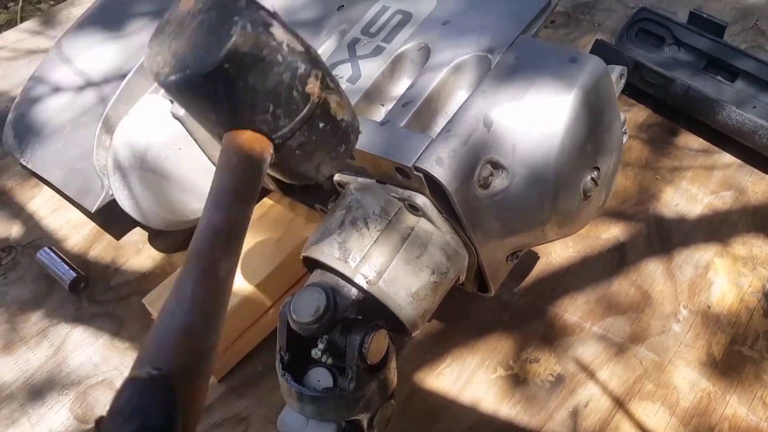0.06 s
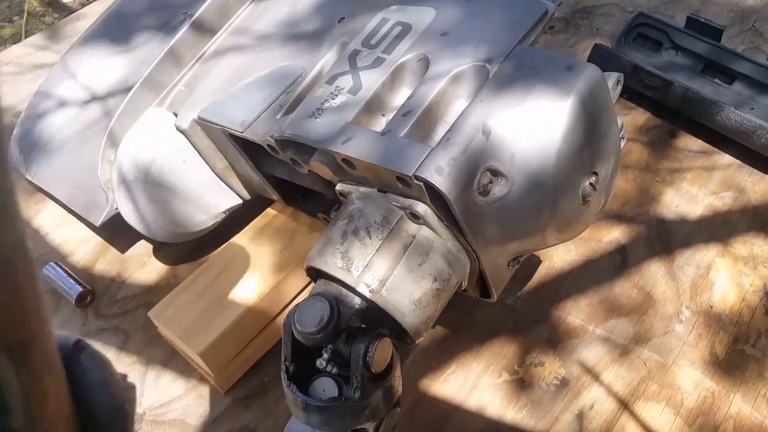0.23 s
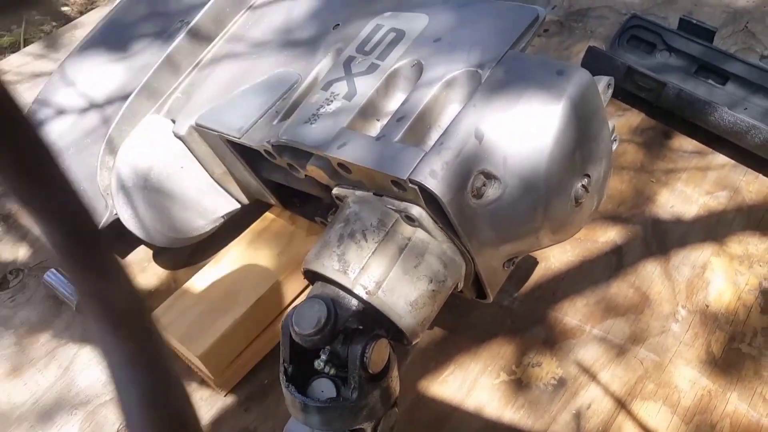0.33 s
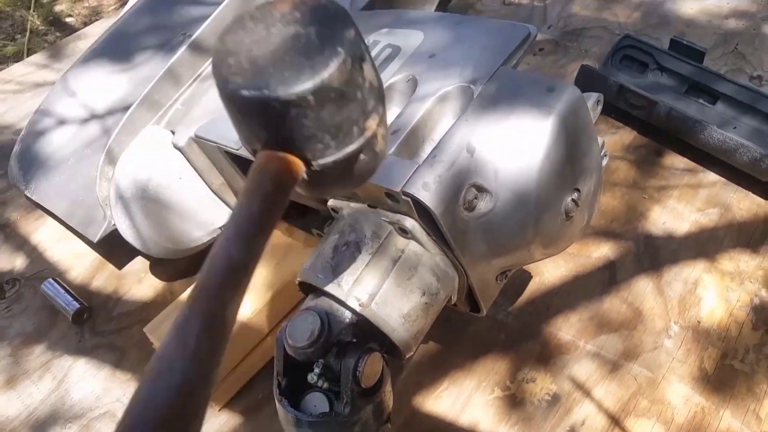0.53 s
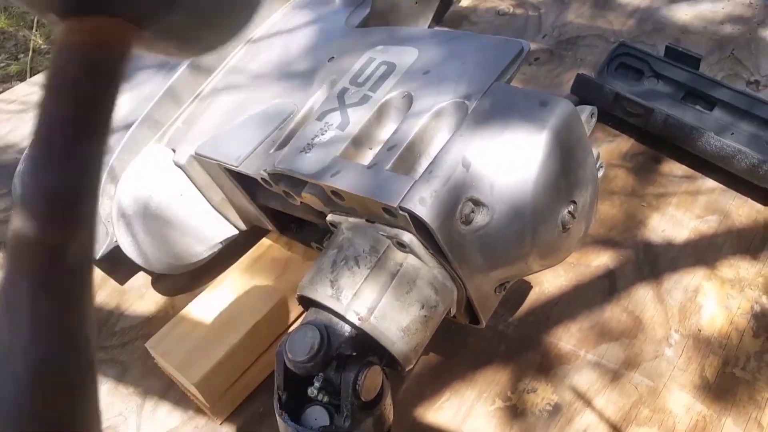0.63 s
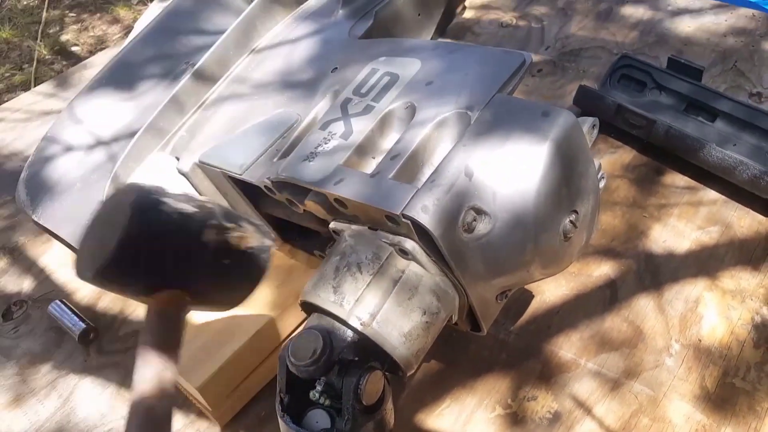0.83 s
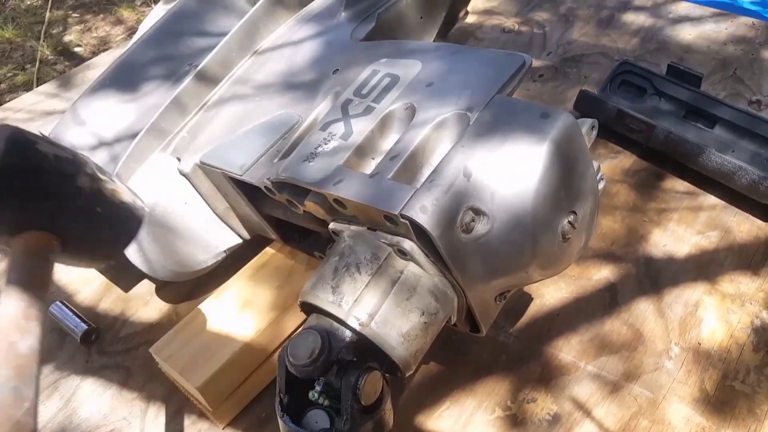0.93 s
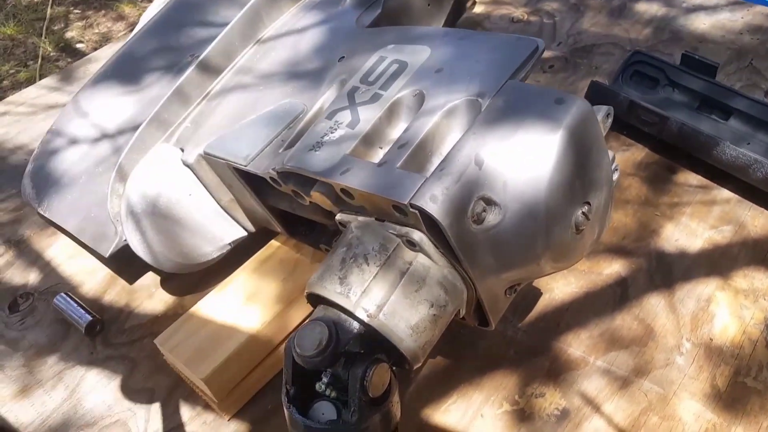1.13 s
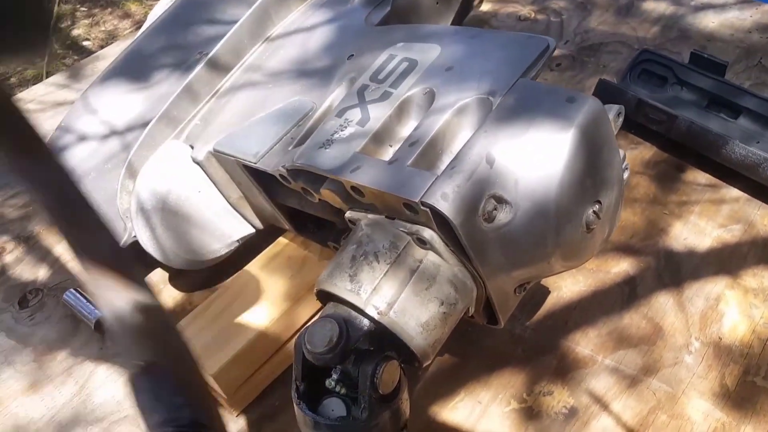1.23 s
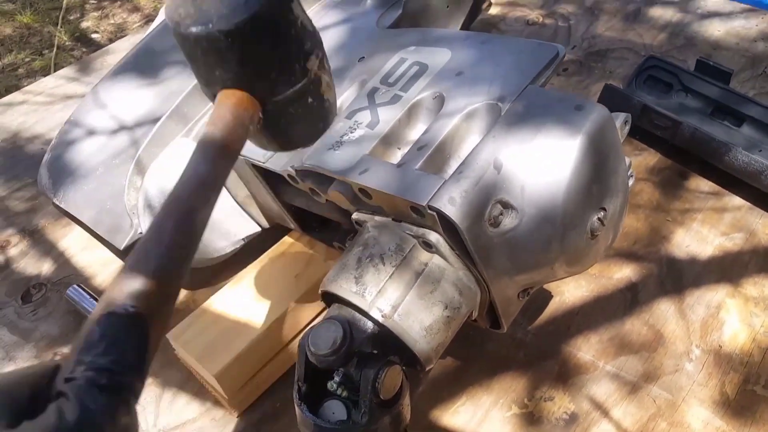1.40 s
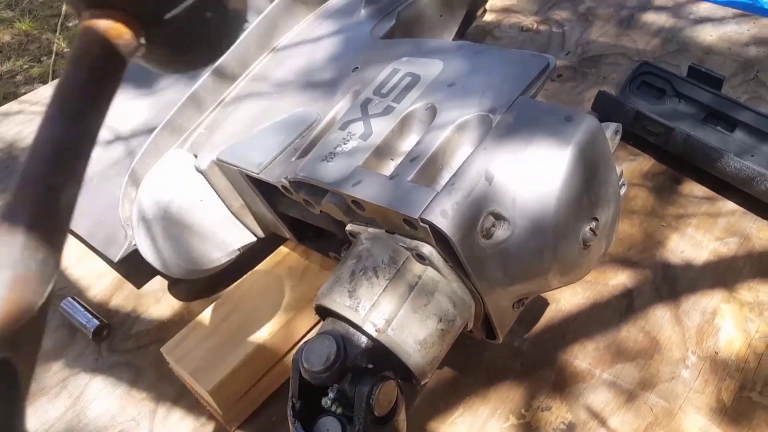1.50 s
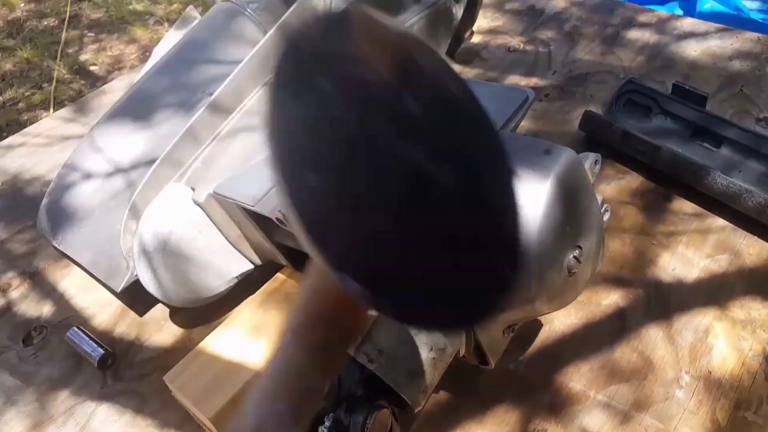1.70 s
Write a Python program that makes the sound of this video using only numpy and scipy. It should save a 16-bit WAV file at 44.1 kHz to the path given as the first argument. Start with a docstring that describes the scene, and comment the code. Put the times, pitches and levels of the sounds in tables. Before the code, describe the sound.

Four evenly spaced mallet blows thud and clank on a metal casing resting on a wooden bench, the first with a thin steely buzz; faint knocks and creaking ticks follow, heard close in quiet open air.

```python
"""Outdoors at a wooden bench: a rubber mallet hits a heavy cast metal housing four times.
Each blow is a resonant bench thump, a short shaped-noise clack, decaying sine ring and rough noise shudder;
narrow noise bands make the buzz of a loose steel part, and a soft noise tail the outdoor echo.
Between blows: noise-burst knocks, narrowband pings, faint rustles and damped-sine creaking ticks.
Steady coloured noise is the quiet open air."""
import sys
import numpy as np
from scipy.fft import rfft, irfft, next_fast_len
from scipy.io import wavfile
from scipy.ndimage import map_coordinates

SR = 44100
rng = np.random.default_rng(int(sys.argv[2]) if len(sys.argv) > 2 else 0)


def bounce(signal):
    """Save signal as a 16-bit WAV file at the path given by the first command-line argument."""
    frames = np.transpose(np.atleast_2d(signal))
    limited = np.clip(frames, -1, 1)
    pcm = np.round(limited * 32767).astype(np.int16)
    wavfile.write(sys.argv[1], SR, pcm)


N = 77175
SIZE = 32768  # samples in one event
T = np.arange(SIZE) / SR  # event time [s]

# Blow levels are relative to each source's gain; knock, ping and rustle levels are used directly.
# Blows: (time [s], thump [dB], clack [dB], clack tilt [dB/octave], shudder [dB], ring [dB],
# ring tilt [dB/octave], buzz [dB], buzz tilt [dB/octave], buzz peak after blow [s])
BLOWS = [(0.0994, 1.5, -0.5, -0.5, -0.5, -1, 3, -4.5, -6, 0.056),
         (0.5035, 0.5, -0.5, 0.5, -2, 0.5, -2, -15.5, 3.5, 0.055),
         (0.9247, 0, 3, -1.5, -4, -4.5, 2, -17, -22, .04), (1.3971, 1, -1, -.5, -2, 4, 2, -5, -10, 0.064)]
# Bench modes: (frequency [Hz], relative level [dB], T60 [s])
BENCH_MODES = [(49.4, -31, 0.26), (88, -17.5, 0.28), (136.7, -8.5, 0.094), (151.8, -17, 0.16),
               (199.9, -8, 0.095), (305, -6.5, 0.81), (374.5, -12.5, 0.39)]
# Housing modes: (frequency [Hz], relative level [dB], T60 [s])
HOUSING_MODES = [(443, -10, .3), (487, -9, .3), (564, -9, .35), (718, -15, .3), (883, -16, .3),
                 (1014, -7, .24), (1458, -3, .21), (2070, 1, .04), (2560, 4, .06), (4110, 1, .025)]
# Clack spectrum: (frequency [Hz], relative level [dB])
CLACK_SPECTRUM = [(40, -39.5), (200, 2), (500, -2.5), (900, -7.5), (1400, -4.5), (1680, -11), (2000, -2.5),
                  (2600, -2), (3000, -10), (3600, -10), (4100, -10), (4700, -20.5), (6600, -15.5),
                  (8400, -29.5), (10500, -34), (12500, -34.5), (14400, -32), (15500, -52)]
# Clack left-right likeness: (frequency [Hz], likeness [0-1])
CLACK_ALIKE = [(500, 0.82), (3000, 0.54), (10000, 0.27)]
# Shudder spectrum: (frequency [Hz], relative level [dB])
SHUDDER_SPECTRUM = [(25, -48.5), (80, -25.5), (200, 0), (330, -2.5), (600, -9.5), (1100, -11.5),
                    (1600, -19), (2600, -26), (4000, -35), (7000, -41), (9500, -40.5), (11000, -59),
                    (15000, -59)]
# General left-right likeness: (frequency [Hz], likeness [0-1])
ALIKE = [(100, .99), (300, .93), (600, .75), (1200, 0.016), (2500, 0.046), (10000, 0)]
# Loose steel resonances: (frequency [Hz], width [Hz], relative level [dB], left minus right [dB])
STEEL_MODES = [(5680, 90, -16, 0), (8538, 55, 0, -6), (9400, 700, -18, -1), (11870, 70, -10, 0),
               (12950, 450, -17, 1), (13780, 150, -22, 0)]
# Buzz left-right likeness: (frequency [Hz], likeness [0-1])
BUZZ_ALIKE = [(5000, 0.83), (12000, 0.19)]
# Settling knocks: (time [s], thud level [dB], clatter level [dB])
KNOCKS = [(0.02, -34.5, -46), (.230, -27.5, -26), (0.262, -29, -35.5), (0.331, -35.5, -38),
          (0.411, -28.5, -43.5), (0.486, -34, -50), (.608, -28.5, -29.5), (0.685, -30, -56),
          (.725, -35.5, -47.5), (1.05, -49, -41.5), (1.101, -32, -49.5), (1.194, -39, -48.5),
          (1.349, -41.5, -72), (1.531, -53, -29), (1.575, -34.5, -36), (1.611, -48, -38),
          (1.626, -42.5, -39.5), (1.741, -33.5, -64)]
# Knock thud spectrum: (frequency [Hz], relative level [dB])
THUD_SPECTRUM = [(40, -26), (120, 6.5), (190, -4), (310, -0.5), (600, -22.5), (1500, -62), (5000, -77)]
# Knock clatter spectrum: (frequency [Hz], relative level [dB])
CLATTER_SPECTRUM = [(150, -7), (500, 5.5), (1200, -4.5), (1700, -13.5), (2200, -17), (3200, -28),
                    (8000, -43), (14000, -57.5)]
# Small-part pings: (time [s], level [dB])
PINGS = [(.217, -40.5), (.606, -31)]
# Mallet-swing rustles: (time [s], length [s], level [dB])
RUSTLES = [(0.622, 0.19, -60), (1.086, 0.42, -60.5)]
# Rustle spectrum: (frequency [Hz], relative level [dB])
RUSTLE_SPECTRUM = [(300, -37), (1200, 4), (1700, -2.5), (2300, 5.5), (3500, -4.5), (4500, -7), (8000, -26),
                   (14000, -57)]
# Creaking ticks: (time [s], level before TICK_GAIN_DB [dB])
TICKS = [(.792, -46.5), (.834, -43), (.864, -46.5), (.877, -48), (.888, -43), (0.898, -44.5),
         (1.143, -45.5), (1.151, -65), (1.159, -40.5), (1.168, -42), (1.182, -48), (1.211, -40.5),
         (1.232, -45), (1.25, -41)]
# Far echo spectrum: (frequency [Hz], relative level [dB])
YARD_SPECTRUM = [(40, -35), (120, 17.5), (300, 0.5), (600, -6.5), (1500, -21.5), (3000, -30.5),
                 (6000, -52.5), (12000, -82.5)]
# Open air spectrum: (frequency [Hz], relative level [dB])
AIR_SPECTRUM = [(20, -33), (50, -1), (85, -3.5), (120, 2.5), (170, -15.5), (300, -10.5), (600, -20),
                (1500, -31), (3000, -33), (5000, -42), (9300, -37.5), (11000, -48.5), (15000, -50.5)]

AIR_DB = -48.5
THUD_T60_S, CLATTER_T60_S = 0.17, 0.064
THUMP_DB, CONTACT_S = -3.5, 0.00679
ROCK_S, ROCK_SHARE = 0.02294, 0.71  # the housing drops back on its block
CLACK_DB, CLACK_LAG_S = -33.5, 0.000412  # the left microphone hears it first
BURST_HOLD_S, BURST_T60_S = 0.0038, 0.024  # clack's starting burst
SHUDDER_DB, SHUDDER_HOLD_S, SHUDDER_T60_S = -20, 0.059, 0.19
SHUDDER_ROUGH_DB, SHUDDER_KNOTS_PER_S = 1.3, 260
RING_DB, RING_LAG_S = -22, 0.00015
BUZZ_DB, BUZZ_RISE_S, BUZZ_T60_S = -30, 0.029, 0.059
YARD_DB, YARD_T60_S = -33, 0.57
PING_HZ, PING_WIDTH_HZ, PING_T60_S = 2100, 120, 0.033
TICK_HZ, TICK_T60_S, TICK_GAIN_DB = 1350, 0.003, 7
BASS_HZ, TOP_HZ = 26.8, 14850  # recorder band edges


def amp(db):
    """Decibels to gain."""
    return 10 ** (np.asarray(db) / 20)


def unit(x):
    """Scale to rms 1."""
    return x / np.sqrt(np.mean(x ** 2) + 1e-20)


def along(points, hz):
    """(Hz, value) points read on a log axis."""
    f, v = np.transpose(points)
    return np.interp(np.log(hz + 1), np.log(f + 1), v)


def colour(points):
    """Gain by frequency from (Hz, dB) points."""
    return lambda hz: amp(along(points, hz))


def tilt(hz, pivot_hz, db_per_octave):
    """Gain of a spectral slope about a pivot, flattened in the bass by the 100 Hz offset."""
    return amp(db_per_octave * np.log2((hz + 100) / pivot_hz))


def filtered(x, response):
    """x times a complex response of frequency."""
    m = next_fast_len(x.shape[-1] + SIZE)
    spectrum = rfft(x, m) * response(np.fft.rfftfreq(m, 1 / SR))
    return irfft(spectrum, m)[..., :x.shape[-1]]


def noise(gain, alike, size=SIZE):
    """Stereo noise of rms 1 with the given colour and left-right likeness."""
    hz = np.fft.rfftfreq(size, 1 / SR)
    turn = np.arccos(np.clip(along(alike, hz), -1, 1)) / 2
    white = rfft(rng.standard_normal((2, size)))
    mid, side = irfft(white * gain(hz) * [np.cos(turn), np.sin(turn)], size)
    return unit(np.array([mid + side, mid - side]))


def envelope(attack_s, hold_s, t60_s):
    """Rise, hold, then an exponential fall."""
    return (1 - np.exp(-T / attack_s)) * amp(-60 * np.maximum(T - hold_s, 0) / t60_s)


def wobble(knots_per_s):
    """A smooth random curve with evenly spaced knots."""
    return map_coordinates(rng.standard_normal(2048), [T * knots_per_s], mode="wrap")


def resonance(f, hz, width_hz):
    """Gain of a peak at hz; width is between its half-gain points."""
    return 1 / (1 + (2 * (f - hz) / width_hz) ** 2)


def add(out, s, sound):
    """Mix a sound in at time s."""
    start = max(round(s * SR), 0)
    out[:, start:start + SIZE] += sound[..., :N - start]


def air():
    """Quiet open air: steady coloured noise."""
    return amp(AIR_DB) * noise(colour(AIR_SPECTRUM), ALIKE, size=N)


def knocks():
    """Housing and bench come to rest: low thuds and brighter clatter in decaying noise."""
    out = np.zeros((2, N))
    for s, thud_db, clatter_db in KNOCKS:
        thud = noise(colour(THUD_SPECTRUM), ALIKE) * envelope(0.0013, 0.0023, THUD_T60_S)
        clatter = noise(colour(CLATTER_SPECTRUM), ALIKE) * envelope(0.0002, 0.0021, CLATTER_T60_S)
        add(out, s, amp(thud_db) * thud + amp(clatter_db) * clatter)
    return out


def thump():
    """The soft push of the rubber, then the housing dropping back, excite the bench modes."""
    def push(start_s):
        return np.sin(np.pi * np.clip((T - start_s) / CONTACT_S, 0, 1)) ** 2

    def bench(f):
        response = 0
        for hz, db, t60_s in BENCH_MODES:
            damping_hz = np.log(1000) / np.pi / t60_s
            response = response + amp(db) * f * f / (hz * hz - f * f + 1j * f * damping_hz)
        return response

    force = push(0.00076) + ROCK_SHARE * push(ROCK_S)
    return amp(THUMP_DB) * filtered(force, bench)


def clack(tilt_db):
    """Metal chatters on metal under the mallet: noise shaped alternately in spectrum and time."""
    burst = noise(np.ones_like, CLACK_ALIKE) * envelope(0.00041, BURST_HOLD_S, BURST_T60_S)
    hz = np.fft.rfftfreq(SIZE, 1 / SR)
    gain = colour(CLACK_SPECTRUM)(hz) * tilt(hz, 2500, tilt_db)
    for _ in range(3):
        phase = np.angle(rfft(burst))
        burst = irfft(gain * np.exp(1j * phase), SIZE) * envelope(0.0001, 0.0057, 0.28)

    def lag_right(f):
        return np.array([np.ones_like(f), np.exp(-2j * np.pi * f * CLACK_LAG_S)])

    return amp(CLACK_DB) * filtered(unit(burst), lag_right)


def shudder():
    """The housing and things on the bench jiggle in dense, uneven contacts: roughened noise."""
    contacts = unit(amp(SHUDDER_ROUGH_DB * wobble(SHUDDER_KNOTS_PER_S)))
    swell = envelope(0.0005, SHUDDER_HOLD_S, SHUDDER_T60_S)
    return amp(SHUDDER_DB) * noise(colour(SHUDDER_SPECTRUM), ALIKE) * contacts * swell


def ring(tilt_db):
    """Damped modes of the casting; the spot that is hit favours the low or the high ones."""
    out = np.zeros((2, SIZE))
    heard_s = T - np.array([[0], [RING_LAG_S]])  # right lags
    for hz, db, t60_s in HOUSING_MODES:
        phase = 2 * np.pi * (hz * heard_s + rng.random())
        level = amp(db + rng.standard_normal()) * tilt(min(hz, 1500), 900, tilt_db)
        out += level * np.sin(phase) * envelope(0.00088, 0, t60_s)
    return amp(RING_DB) * out


def buzz(peak_s, tilt_db):
    """A loose steel part rattles up to a thin zing and dies away: noise through its resonances."""
    def steel(f):
        response = 0
        for hz, width_hz, db, pan_db in STEEL_MODES:
            level = amp(db + np.array([[pan_db], [-pan_db]]) / 2) * tilt(hz, 8500, tilt_db)
            response = response + level * resonance(f, hz, width_hz)
        return response

    rise = np.exp(np.minimum(T - peak_s, 0) / BUZZ_RISE_S)
    swell = np.minimum(rise, envelope(0.002, peak_s, BUZZ_T60_S))
    return amp(BUZZ_DB) * unit(filtered(noise(np.ones_like, BUZZ_ALIKE), steel)) * swell


def yard_echo():
    """Faint outdoor echo: a soft-edged tail of dark noise."""
    return amp(YARD_DB) * noise(colour(YARD_SPECTRUM), ALIKE) * envelope(0.015, 0.14, YARD_T60_S)


def pings():
    """A small part pings: short bursts of narrowband noise."""
    out = np.zeros((2, N))
    for s, db in PINGS:
        ping = noise(lambda f: resonance(f, PING_HZ, PING_WIDTH_HZ), ALIKE)
        add(out, s, amp(db) * ping * envelope(0.0019, 0.0019, PING_T60_S))
    return out


def rustles():
    """Faint rustles as the mallet swings: coloured noise under half-sine swells."""
    out = np.zeros((2, N))
    for s, length_s, db in RUSTLES:
        swell = np.sin(np.pi * np.minimum(T / length_s, 1))
        add(out, s, amp(db) * noise(colour(RUSTLE_SPECTRUM), ALIKE) * swell)
    return out


def ticks():
    """Tiny dry creaking slips while the mallet is lifted: fast-damped sines of varied pitch."""
    out = np.zeros((2, N))
    for s, db in TICKS:
        hz = TICK_HZ * np.exp(0.073 * rng.standard_normal())
        slip = np.sin(2 * np.pi * hz * T) * amp(-60 * T / TICK_T60_S)
        add(out, s, amp(db + TICK_GAIN_DB) * slip)
    return out


def scene():
    """Four blows with their faint echo, the small sounds between them and the air."""
    out = air() + knocks() + pings() + rustles() + ticks()
    thump_pan = amp([[-0.55], [0.55]])  # left, right
    shudder_pan = amp([[-0.6], [0.6]])
    for (s, thump_db, clack_db, clack_tilt, shudder_db, ring_db, ring_tilt,
         buzz_db, buzz_tilt, buzz_peak_s) in BLOWS:
        add(out, s, amp(thump_db) * thump() * thump_pan)
        add(out, s, amp(clack_db) * clack(clack_tilt))
        add(out, s, amp(shudder_db) * shudder() * shudder_pan)
        add(out, s, amp(ring_db) * ring(ring_tilt))
        add(out, s, amp(buzz_db) * buzz(buzz_peak_s, buzz_tilt))
        add(out, s, yard_echo())
    return out


def record(dry):
    """The recorder cuts the deepest bass, rounds off the highest peaks and cuts the top treble."""
    thinned = filtered(dry, lambda hz: 1j * hz / (1j * hz + BASS_HZ))
    rounded = thinned / (1 + np.abs(thinned / 0.95) ** 8) ** (1 / 8)
    return filtered(rounded, lambda hz: 1 / (1 + (hz / TOP_HZ) ** 120))


dry = scene()
out = record(dry)
bounce(out)
```